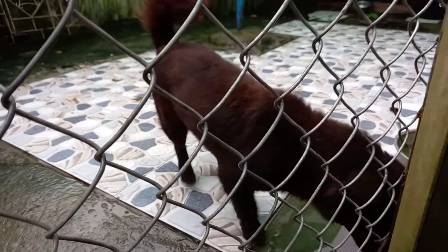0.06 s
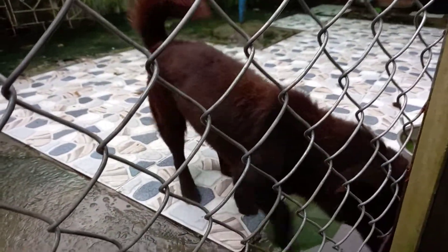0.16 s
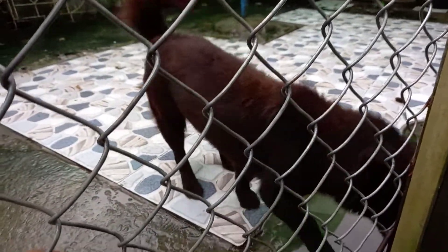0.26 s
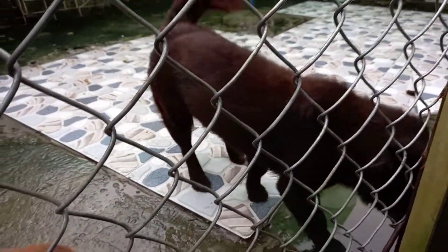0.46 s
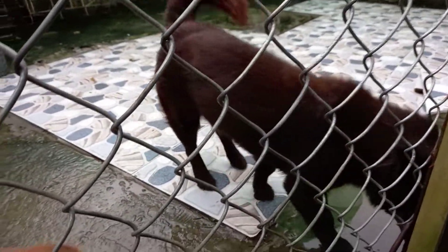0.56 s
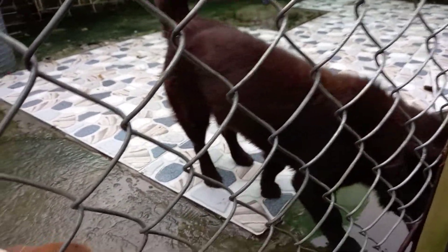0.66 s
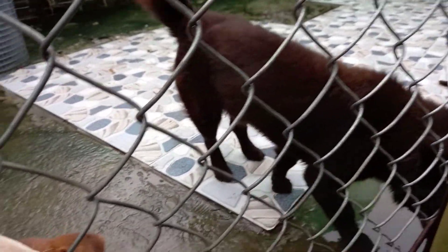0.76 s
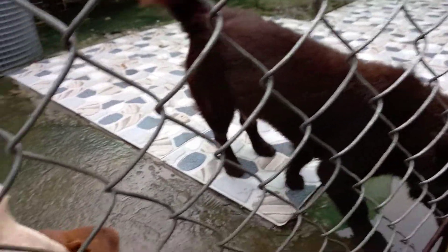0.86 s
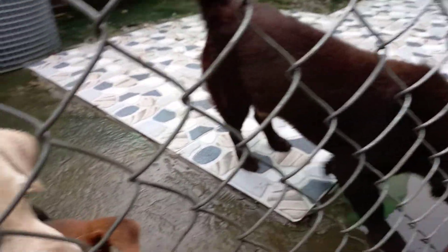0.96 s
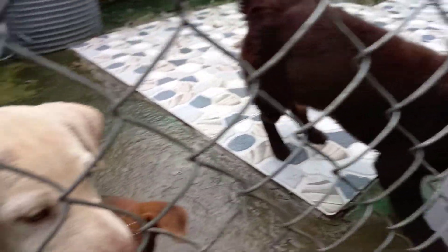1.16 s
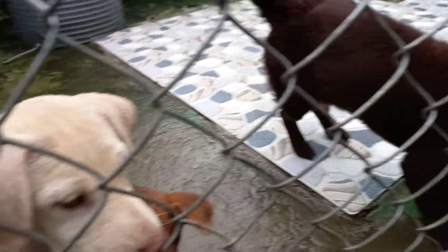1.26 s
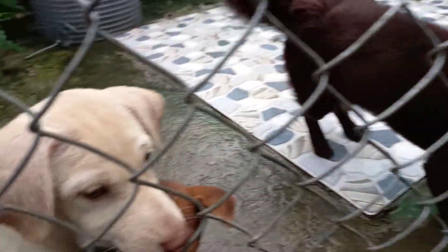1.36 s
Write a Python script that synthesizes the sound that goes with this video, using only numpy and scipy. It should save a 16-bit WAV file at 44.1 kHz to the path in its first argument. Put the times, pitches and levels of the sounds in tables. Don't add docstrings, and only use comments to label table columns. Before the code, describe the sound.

Several dogs yelp: a faint nasal whistle, then one sharp clear yelp close by, overlapped by a farther yelp, hoarse bark and grunt; a later cluster echoes in a hard tiled yard, picked up by a handheld microphone.

```python
import sys
import numpy as np
from scipy import signal
from scipy.fft import rfft, irfft, next_fast_len
from scipy.io import wavfile
from scipy.ndimage import uniform_filter1d, map_coordinates

SR = 44100
rng = np.random.default_rng(int(sys.argv[2]) if len(sys.argv) > 2 else 0)


def bounce(signal):
    frames = np.transpose(np.atleast_2d(signal))
    limited = np.clip(frames, -1, 1)
    pcm = np.round(limited * 32767).astype(np.int16)
    wavfile.write(sys.argv[1], SR, pcm)


def how_loud(loudness_db):
    steps = np.asarray(loudness_db, float) / 20
    return 10 ** steps


N = 61739
LEAD = 13230
TIME = np.arange(-LEAD, N) / SR

# time in seconds, pitch in Hz, level in dB, roughness 0 to 1.
EARLIER_YELP_CALL = [(-.2, 500, -65, 0.8), (-.15, 552, -34.5, 0.97), (-.03, 628.1, -42, 0.8),
                     (.07, 617, -53.5, 0.88)]
NEAR_YELP_CALL = [(.204, 403, -30, .08), (.21, 414, -20, .08), (.217, 436, -15.5, .08),
                  (.226, 476, -15, .05), (.236, 515, -14.5, .02), (.251, 542, -16, .02),
                  (.274, 546, -16.5, .02), (.282, 525, -27, .04), (.293, 495, -37, .1)]
FAR_YELP_CALL = [(.295, 490.6, -62.5, .3), (.315, 550.5, -22, .4), (.34, 608, -18, .2),
                 (.355, 625.5, -19, 0.055), (.375, 639.2, -17, .08), (.383, 615, -37.5, 0.046),
                 (.393, 626.7, -19, 0.045), (.408, 628.5, -28, .2), (.42, 580, -51, 0.44)]
HOARSE_BARK_CALL = [(.29, 444.3, -24, 1), (.32, 544.6, -34.5, 0.55), (.37, 566.6, -28, 0.15),
                    (.42, 483, -31.5, 0.11), (.46, 434, -49.5, 0.67)]
LOW_GRUNT_CALL = [(.35, 393.2, -43.5, 0.73), (.4, 453.3, -39, 0.93), (.46, 454, -53.5, 0.31),
                  (.53, 461, -61, 0.39)]
LATE_YELP_CALL = [(.762, 483.7, -46.5, .6), (.785, 527.4, -42, .35), (.8, 524.6, -28, .3),
                  (.812, 576.6, -30.5, .3), (.826, 621, -32.5, .25), (.836, 619.8, -30, .25),
                  (.856, 621.2, -28.5, .25), (.872, 626, -40.5, 0.46), (.925, 613, -51.5, 1)]
LATE_BARK_CALL = [(.768, 400.5, -38, .7), (.79, 381.5, -31, .4), (.815, 433.7, -26.5, .35),
                  (.835, 457.8, -24.5, .2), (.85, 448.4, -27, .25), (.865, 422.7, -34.5, .5),
                  (.9, 443, -35, .5)]
LATE_WOOF_CALL = [(.82, 638.5, -79.5, 0.37), (.845, 682.5, -29, 0.19), (.862, 690.3, -41.5, 0.17),
                  (.88, 731.4, -27.5, 0.47), (.895, 627.2, -50.5, 0.77), (.92, 475.4, -34, 0.39),
                  (.945, 411.4, -47, 1), (1.0, 379.2, -55, 0.49), (1.09, 369.3, -49, 0.6)]
GROAN_CALL = [(.97, 89, -62, .2), (1.01, 88, -63, .2), (1.05, 86, -56, .15), (1.085, 86, -63, .2),
              (1.12, 87, -54, .15), (1.15, 86, -63, .2), (1.18, 86, -58, .15), (1.21, 84, -63, .2),
              (1.3, 86, -76, .2)]

# frequency in Hz, gain in dB.
NEAR_THROAT_DB = [(300, -20), (520, -26), (1000, -14), (2100, -15.5), (3700, -16), (4500, -27), (7500, -48),
                  (15500, -63.5)]
FAR_THROAT_DB = [(400, -22.5), (625, -12), (1150, 10), (1500, -27.5), (1900, 7), (2700, -18.5),
                 (4300, -22.5), (7500, -54.5)]
LATE_THROAT_DB = [(380, -37.5), (600, -2.5), (900, 4), (1300, 1), (1800, 5.5), (2250, -1), (2620, -2.5),
                  (4200, -32)]
WOOF_THROAT_DB = [(250, -20), (380, -8.5), (700, -7), (1400, -13), (2700, -27.5), (5000, -73)]
GROAN_THROAT_DB = [(60, -13), (88, -1.5), (175, 3.5), (260, -7), (350, 5), (450, -17), (900, -22),
                   (2000, -80)]
# width in Hz, gain in dB.
NEAR_FORMANTS_HZ_DB = [(160, 6), (250, 6)]
# time in seconds, first and second resonance in Hz.
NEAR_MOUTH_HZ = [(.205, 1240, 2450), (.22, 1350, 2800), (.235, 1520, 2750), (.25, 1300, 2720),
                 (.275, 1120, 2720)]

# time in seconds, pitch in Hz, level in dB.
WHISTLE_CALLS = [
    [(-.1, 6190, -50), (.05, 6175, -47.5), (.13, 6150, -50), (.19, 6195, -43), (.215, 6180, -50)],
    [(.555, 5790, -83), (.565, 6200, -77), (.575, 6370, -62), (.585, 6500, -72)],
    [(.65, 6479, -71), (.665, 6550, -54), (.682, 6760, -43), (.69, 6520, -52), (.697, 6480, -43),
     (.704, 6226, -62), (.711, 6280, -53.5), (.726, 5800, -58), (.738, 5780, -56)],
    [(1.045, 6750, -76.5), (1.058, 6500, -57.5), (1.078, 6110, -71), (1.1, 5835, -70), (1.125, 5477, -67),
     (1.135, 5550, -82)],
]
# time in seconds, level in dB.
PANT_FLOW_DB = [(0, -78), (.06, -67), (.09, -91), (.19, -78.5), (.23, -46), (.3, -60.5), (.37, -54.5),
                (.45, -66.5), (.53, -79.5), (.67, -75.5), (.7, -70.5), (.76, -72), (.88, -62.5),
                (1.04, -71.5), (1.17, -82.5), (1.24, -72), (1.3, -91)]
# frequency in Hz, level in dB per Hz.
PANT_SPECTRUM_DB = [(2000, -43), (4300, -11), (6800, -2.5), (8300, -14.5), (11200, -14), (15700, -29)]
# frequency in Hz, level in dB per Hz.
RUMBLE_SPECTRUM_DB = [(25, -57), (45, -26), (70, 5), (130, -5), (280, -14.5), (1400, -7.5), (6400, -28.5),
                      (9000, -54.5)]
# time in seconds, gain in dB.
RUMBLE_FADE_DB = [(0, -5), (.3, -4.5), (.6, -8), (.95, -6), (1.15, -3.5), (1.3, -18), (1.4, -29)]
# frequency in Hz, likeness 0 to 1.
LIKENESS = [(40, 0.94), (200, .95), (500, 0.49), (1500, 0.12), (10000, 0.027)]

# frequency in Hz, T60 in seconds.
YARD_T60_S = [(200, 0.81), (600, 0.55), (2000, 0.44), (5000, 0.67), (12000, 0.32)]
# frequency in Hz, split in Hz, level in dB, T60 in seconds.
METAL_MODES = [
    (625, 24, -20, .55),
    (1880, 34, -25, .7),
    (2660, 25, -26, .5),
]
# left delay in seconds, right delay in seconds, level in dB.
NEAR_BOUNCES = [
    (.0021, 0.0027, -11.5),
    (.0047, .0039, -13.5),
    (.0083, .0092, -19.5),
]


def unit(x):
    return x / np.sqrt(np.mean(x ** 2) + 1e-20)


def along(points, hz):
    f, v = np.transpose(points)
    return np.interp(np.log(hz + 1), np.log(f + 1), v)


def curves(rows):
    s, *columns = np.transpose(rows)
    gate = np.clip(np.minimum(TIME - s[0], s[-1] - TIME) / 0.0057, 0, 1)
    return [gate] + [np.interp(TIME, s, column) for column in columns]


def wobble(rate_hz):
    knots = rng.standard_normal(int(len(TIME) * 2000 / SR) + 4)
    return map_coordinates(knots, [np.arange(len(TIME)) * min(rate_hz, 2000) / SR])


def filtered(x, response):
    m = next_fast_len(len(TIME) + 8192)
    hz = np.fft.rfftfreq(m, 1 / SR)
    return irfft(rfft(x, m) * response(hz), m)[..., :len(TIME)]


def yard_echo():
    hz, t, z = signal.stft(rng.standard_normal((3, SR)), SR, nperseg=256)
    decay = how_loud(-60 * t / along(YARD_T60_S, hz)[:, None])
    tail = signal.istft(z * decay, SR, nperseg=256)[1]
    tail = tail[1:] + 0.2 * tail[0]
    tail = tail / np.linalg.norm(tail[0])
    s = np.arange(tail.shape[1]) / SR
    for mode_hz, split_hz, db, t60_s in METAL_MODES:
        pair = 0
        for way in (-1, 1):
            pair = pair + np.sin(2 * np.pi * ((mode_hz + way * split_hz / 2) * s + rng.random((2, 1))))
        tail = tail + how_loud(db - 60 * s / t60_s) * pair / np.sqrt(SR * t60_s / (2 * np.log(1000)))
    return tail


def placed(x, pan_db, lag_s, wet_db, shade_hz=np.inf, bounces=()):
    side = np.array([[.5], [-.5]])

    def path(hz):
        arrivals = 1
        for left_s, right_s, db in bounces:
            arrivals = arrivals + how_loud(db) * np.exp(-2j * np.pi * hz * np.array([[left_s], [right_s]]))
        lag = lag_s * side / np.hypot(1, hz / shade_hz)
        return arrivals * how_loud(pan_db * side) * np.exp(-2j * np.pi * hz * lag)

    direct = filtered(x, path)
    late = np.pad(x, (350, 0))[None]
    echo = signal.fftconvolve(late, yard_echo(), axes=1)
    return direct + how_loud(wet_db) * echo[:, :len(TIME)]


def voice(call, throat, jitter, formants=(), mouth=None, drift_db=0.5):
    gate, hz, db, rough = curves(call)
    rough, on = np.clip(rough, 0, 1), gate > 0
    phase = 2 * np.pi * np.cumsum(hz * (1 + jitter * wobble(250)))[on] / SR
    centres_hz = [c[on] for c in curves(mouth)[1:]] if mouth else []

    def colour(f, at_hz):
        peaks = sum(how_loud(g) / (1 + ((f - c) / w) ** 2) for c, (w, g) in zip(at_hz, formants))
        return how_loud(along(throat, f)) * (1 + peaks)

    k = np.arange(1, 29)[:, None]
    drift = np.sin(2 * np.pi * (rng.random(k.shape) + (8 + 14 * rng.random(k.shape)) * TIME[on]))
    gains = colour(k * hz[on], centres_hz) * how_loud(drift_db * np.minimum(k, 9) * drift)
    if formants:
        turn = sum(np.arctan((k * hz[on] - c) / w) for c, (w, g) in zip(centres_hz, formants))
    else:
        turn = 2 * np.pi * rng.random(k.shape)
    tone = np.zeros(len(TIME))
    tone[on] = -(gains * np.cos(k * phase - turn)).sum(0) / np.sqrt((gains ** 2).sum(0) / 2)

    puffs = rng.standard_normal(len(TIME))
    puffs[on] *= (1 + np.cos(phase)) ** 2
    breath = filtered(puffs, lambda f: colour(f, [c[0] for c in centres_hz]))
    breath = breath / np.sqrt(np.mean(breath[on] ** 2))
    shimmer = how_loud(6 * rough * wobble(120))
    return gate * how_loud(db) * (np.sqrt(1 - rough ** 2) * shimmer * tone + rough * breath)


def dogs():
    near_yelp = voice(NEAR_YELP_CALL, NEAR_THROAT_DB, 0.0049, NEAR_FORMANTS_HZ_DB, NEAR_MOUTH_HZ, drift_db=-0.46)
    out = how_loud(2) * placed(near_yelp, -2.0, 0.00027, wet_db=-14, shade_hz=1290, bounces=NEAR_BOUNCES)
    out += placed(voice(EARLIER_YELP_CALL, LATE_THROAT_DB, 0.023), -1.2, 0.0006, wet_db=-1.0)
    out += placed(voice(FAR_YELP_CALL, FAR_THROAT_DB, 0.0089), 0.011, -0.00036, wet_db=-9)
    out += placed(voice(HOARSE_BARK_CALL, LATE_THROAT_DB, 0.019), -0.33, 0.0003, wet_db=-7.0)
    out += placed(voice(LATE_YELP_CALL, LATE_THROAT_DB, 0.0158), 0.47, 0.000066, wet_db=-4.5)
    out += placed(voice(LATE_BARK_CALL, LATE_THROAT_DB, 0.017), -1.7, 0.00023, wet_db=-8.5)
    out += placed(voice(LATE_WOOF_CALL, WOOF_THROAT_DB, 0.0094), -0.51, 0.00036, wet_db=-3.0)
    grunt = voice(LOW_GRUNT_CALL, WOOF_THROAT_DB, 0.027)
    groan = voice(GROAN_CALL, GROAN_THROAT_DB, 0.0383)
    return out + placed(grunt + groan, -1.3, 0.0001, wet_db=-17)


def whistles():
    out = np.zeros(len(TIME))
    for rows in WHISTLE_CALLS:
        gate, hz, db = curves(rows)
        level = gate * how_loud(db + 3 + 3 * wobble(60.9))
        out += level * np.sin(2 * np.pi * np.cumsum(hz + 12 * wobble(73)) / SR)
    return placed(out, 0.52, 0.0002, wet_db=-7)


def rush(spectrum, patchy_db):
    z = signal.stft(rng.standard_normal((2, len(TIME))), nperseg=512)[2]
    field = uniform_filter1d(rng.standard_normal(z.shape[1:]), size=6, axis=0)
    field = uniform_filter1d(field, size=8, axis=1)
    pair = signal.istft(z * how_loud(patchy_db * unit(field)), nperseg=512)[1][:, :len(TIME)]

    def mid_side(hz):
        angle = np.arccos(np.clip(along(LIKENESS, hz), -1, 1)) / 2
        return how_loud(along(spectrum, hz)) * np.array([np.cos(angle), np.sin(angle)])

    mid, side = filtered(pair, mid_side)
    return unit(np.array([mid + side, mid - side]))


def panting():
    _, flow_db = curves(PANT_FLOW_DB)
    return how_loud(flow_db + 7.5 + 1.5 * wobble(40)) * rush(PANT_SPECTRUM_DB, patchy_db=1.5)


def thud():
    start_s, level_db, ring_hz, t60_s = .395, -28, 168, .1
    t = np.clip(TIME - start_s, 0, None)
    onset = (1 - np.exp(-t / .015)) ** 2
    ring = how_loud(level_db - 60 * t / t60_s) * onset * np.sin(2 * np.pi * ring_hz * t)
    return placed(ring, -4.5, 0.0001, wet_db=-26.0)


def rumble():
    _, fade_db = curves(RUMBLE_FADE_DB)
    level = how_loud(fade_db) * how_loud(-48.5 + 1.8 * wobble(2))
    return level * rush(RUMBLE_SPECTRUM_DB, patchy_db=-2.0) * how_loud([[-1.1], [1.1]])


def scene():
    mix = dogs() + whistles() + panting() + thud() + rumble()
    return mix[:, LEAD:]


def low_pass(x):
    return signal.sosfilt(signal.butter(12, 15780, fs=SR, output="sos"), x)


def record(dry):
    bass_cut_hz, band_top_hz, ceiling = 56, 15780, .99
    roll_off = signal.butter(2, bass_cut_hz, "high", fs=SR, output="sos")
    thin = signal.sosfilt(roll_off, dry)
    thin = filtered(thin, lambda hz: hz < band_top_hz)[:, :N]
    mix = thin / (1 + np.abs(thin / ceiling) ** 20) ** (1 / 20)
    return low_pass(mix)


dry = scene()
out = record(dry)
bounce(out)
```